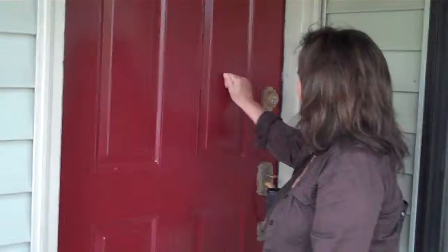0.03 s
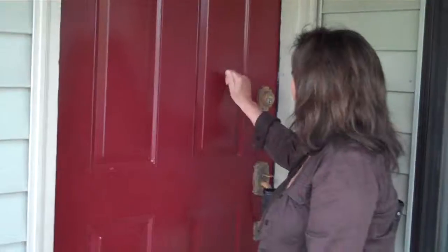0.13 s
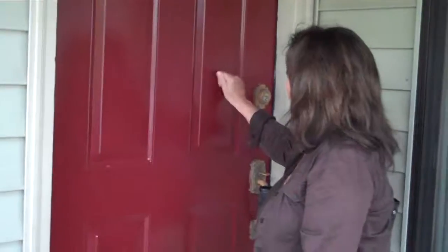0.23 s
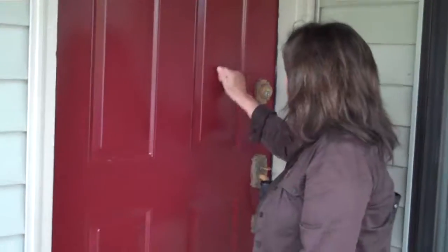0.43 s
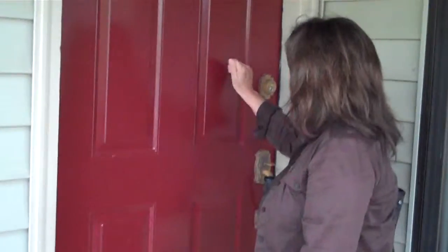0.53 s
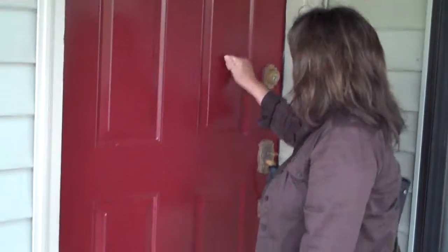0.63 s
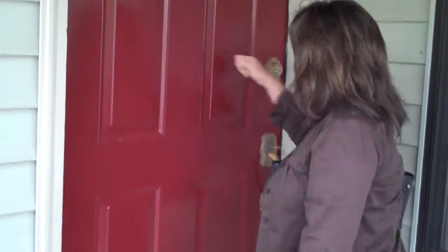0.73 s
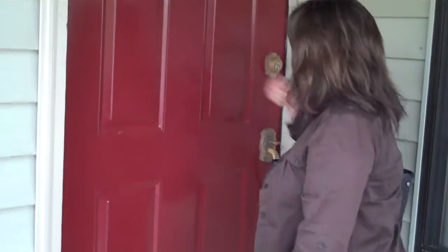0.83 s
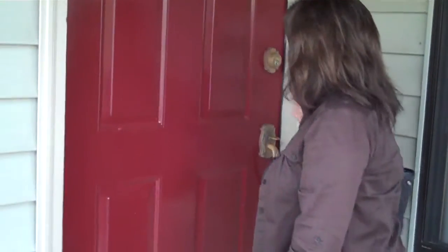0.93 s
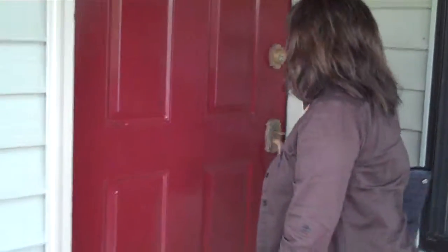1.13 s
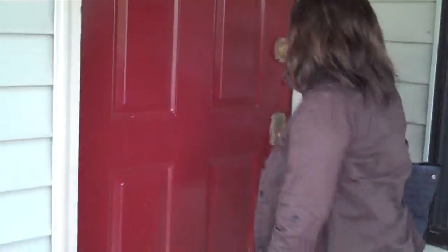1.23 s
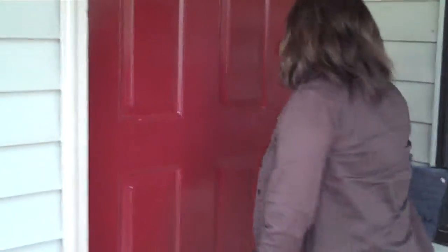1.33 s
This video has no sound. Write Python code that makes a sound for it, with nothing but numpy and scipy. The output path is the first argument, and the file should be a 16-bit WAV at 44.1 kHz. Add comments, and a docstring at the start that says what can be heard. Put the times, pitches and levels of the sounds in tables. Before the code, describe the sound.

Someone knocks four times briskly on a panelled wooden door outside, over quiet street noise

```python
"""A moment of street noise and faint low hum, then four quick knuckle raps on a panelled wooden front door.
Each rap rings the door's modes as fading sine waves, and its dense high modes are a puff of noise.
The porch returns echoes of the ring. Something small ticks: short bright cycles with hissing tails.
Brief rustles and faint tones are narrow filtered noise. At the end a scuffing noise swells, made of
dense random grains ringing a few resonances under a hiss."""
import sys
import numpy as np
from scipy import signal
from scipy.fft import rfft, irfft
from scipy.io import wavfile
from scipy.ndimage import uniform_filter1d

SR = 44100
rng = np.random.default_rng(int(sys.argv[2]) if len(sys.argv) > 2 else 0)


def store_wav(level_fs):
    """Save 16-bit WAV to argv[1]."""
    pcm = np.round(np.clip(np.atleast_2d(level_fs), -1, 1) * 32767)
    wavfile.write(sys.argv[1], SR, pcm.T.astype(np.int16))


def ratio_of_db(decibels):
    """Turn decibels (scalar or array-like) into linear amplitude factors; 0 dB maps to 1."""
    return 10 ** (np.asarray(decibels, float) / 20)


N = 61739  # length in samples, 1.4 s


def evened(x):
    """Scales a sound to an rms (average strength) of 1."""
    return x / np.sqrt(np.mean(x ** 2) + 1e-20)


def read(points, hz):
    """Reads a table between its points, along a logarithmic pitch axis."""
    f, value = np.transpose(points)
    return np.interp(np.log(hz + 1), np.log(f + 1), value)


def add(mix, s, sound):
    """Mixes a sound in at time s, in seconds."""
    part = mix[round(s * SR):][:len(sound)]
    part += sound[:len(part)]


def resonate(x, hz, width):
    """A two-pole resonance with a gain of 1 at its peak; a smaller width in Hz rings longer."""
    return signal.lfilter(*signal.iirpeak(hz, hz / width, SR), x)


def coloured(points, size):
    """Noise shaped to a given spectrum, with rms 1."""
    spectrum = rfft(rng.standard_normal(size))
    gain = ratio_of_db(read(points, np.fft.rfftfreq(size, 1 / SR)))
    return evened(irfft(spectrum * gain, size))


def street():
    """Patchy outdoor noise: random spectra whose level and treble drift from moment to moment."""
    # colour of the noise: pitch_hz, relative_level_db (per Hz)
    street_colour = [(20, -8), (40, -18), (70, -21.5), (150, -8), (204, -18), (275, -11), (415, -13),
                     (660, -7.5), (900, -7.5), (1500, -7.5), (2100, -12), (3000, -16), (5000, -20.5),
                     (9000, -24), (13700, -29.5)]
    # drift over time: time_s, level_db, treble_change_db
    street_drift = [(.04, -57, -13), (.3, -58, -8.5), (.55, -58.5, -8), (.68, -53.5, -22.5),
                    (.8, -61, -2.5), (.92, -59.5, -2.5), (0.968, -56.5, -0.5), (1.03, -57, -7.5),
                    (1.09, -58, 0), (1.15, -58.5, 1), (1.25, -58.5, 1), (1.4, -58, -11)]
    treble_hz, patchy_db = 3260, 0.8
    frames, hz = N // 256 + 5, np.fft.rfftfreq(1024, 1 / SR)
    real, imaginary, patches = rng.standard_normal((frames, 513, 3)).T
    # smooth over pitch, then over time, to make soft-edged patches
    patches = uniform_filter1d(patches, 24, 0)
    patches = evened(uniform_filter1d(patches, 8, 1))
    s, db, treble_db = np.transpose(street_drift)
    t = np.arange(frames) * 256 / SR
    noise = (real + 1j * imaginary) * ratio_of_db(read(street_colour, hz))[:, None]
    steady = signal.istft(noise, nperseg=1024, noverlap=768)[1]
    steady_rms = np.sqrt(np.mean(steady ** 2))
    # 0 in the bass, near 1 well above treble_hz
    treble_share = (hz ** 2 / (hz ** 2 + treble_hz ** 2))[:, None]
    level_db = patchy_db * patches + np.interp(t, s, db) + treble_share * np.interp(t, s, treble_db)
    drifting = signal.istft(noise * ratio_of_db(level_db), nperseg=1024, noverlap=768)[1]
    return drifting[:N] / steady_rms


def hum():
    """A low sine tone that drifts in pitch and wavers in level."""
    # path of the hum: time_s, pitch_hz, level_db (rms, before the waver)
    hum_path = [(.04, 160.6, -89), (0.298, 159.1, -70), (0.519, 160.7, -68.5), (.72, 164.7, -65.5),
                (.82, 161.3, -74), (.9, 152.8, -69.5), (1.05, 147.3, -75.5), (1.4, 153, -83)]
    waver_db = 0.5
    s, hz, db = np.transpose(hum_path)
    t = np.arange(N) / SR
    waver = uniform_filter1d(rng.standard_normal(N), 1500)
    waver = evened(uniform_filter1d(waver, 1500))
    level = np.sqrt(2) * ratio_of_db(np.interp(t, s, db) + waver_db * waver)
    phase = 2 * np.pi * np.cumsum(np.interp(t, s, hz)) / SR
    return level * np.sin(phase)


def door_ring(hardness, whole_db, panel_db):
    """A short push sets the door's modes ringing as fading sines; a harder knock favours high modes."""
    # door modes: pitch_hz, relative_level_db, t60_s (time to fade by 60 dB)
    door_modes = [(222, -5, 0.18), (249, 4.5, 0.14), (272.5, -11.5, 0.19), (326.4, -3.5, 0.12),
                  (370.5, 2.5, 0.11), (382, -24, 0.12), (426, -11.5, 0.33), (496.4, 3, 0.16),
                  (535.7, 4.5, 0.094), (611.4, 8.5, 0.039), (672, -5, 0.1), (789.6, 5, 0.076),
                  (874.6, -1.16, 0.079), (936, -9.5, 0.15), (1031, -6, 0.077), (1178, -10.5, 0.083),
                  (1364.5, 0.5, 0.033), (1387, 4.5, 0.03), (1536, -4, 0.047), (1559, -7.5, .06),
                  (1790, -11, 0.052), (2050, -21, 0.043), (2337, -21, 0.032), (2980, -51, 0.024)]
    whole_hz, panel_hz = 270, 460  # whole-door modes lie below the first, large-panel modes between
    push_s, bass_cut_hz, spot_db = 0.002, 78, 0.5
    t = np.arange(SR) / SR
    hz, db, t60 = np.transpose(door_modes)
    db = db + hardness * np.log2(hz / 700)
    db += spot_db * rng.standard_normal(len(hz))  # mode levels vary a little from rap to rap
    db += np.where(hz < whole_hz, whole_db, panel_db * (hz < panel_hz))
    hz, db, t60 = hz[:, None], db[:, None], t60[:, None]
    ring = -(ratio_of_db(db - 60 * t / t60) * np.sin(2 * np.pi * hz * t)).sum(0)
    ring *= 1 - np.exp(-t / push_s)
    bass_cut = signal.butter(2, bass_cut_hz, "high", fs=SR, output="sos")
    return signal.sosfilt(bass_cut, ring)


def door_puff(crack_db):
    """The door's high modes are too dense to hear singly: a grainy puff of noise that fades."""
    # colour of the puff: pitch_hz, relative_level_db
    puff_colour = [(30, 7), (100, 11), (300, -42), (1500, 14), (2500, 6), (3300, 3.5), (4500, -3),
                   (7000, -10), (10000, -9), (14000, -18.5)]
    puff_db, rise_s, t60_s, grain_db = -4.5, 0.0068, 0.12, 1.5
    t = np.arange(SR) / SR
    puff = coloured(puff_colour, size=SR) * (1 - np.exp(-t / rise_s))
    puff *= ratio_of_db(puff_db + crack_db - 60 * t / t60_s)
    grain = evened(uniform_filter1d(rng.standard_normal(SR), 60))
    return puff * ratio_of_db(grain_db * grain)


def raps():
    """Four knocks: each one's strength scales both its ring and its puff, returned separately."""
    # knocks: start_s, strength_db, hardness_db (per octave), whole_door_db, large_panel_db, crack_db
    knocks = [(0.0534, -37.5, 3, 3., 5.5, 7.5), (0.233, -41.5, 2.84, 4.5, -3.5, 2.1),
              (0.4179, -41, 2.7, 0.6, -2, 2), (0.6132, -40.5, 3.3, 0.8, 1.5, 0)]
    rings, puffs = np.zeros(N), np.zeros(N)
    for s, strength_db, hardness, whole_db, panel_db, crack_db in knocks:
        add(rings, s, ratio_of_db(strength_db) * door_ring(hardness, whole_db, panel_db))
        add(puffs, s, ratio_of_db(strength_db) * door_puff(crack_db))
    return rings, puffs


def porch(x):
    """Adds a few strong echoes, duller the later they come, and sparse taps dying band by band."""
    # strong echoes: delay_s, relative_level_db (before the losses below)
    early_echoes = [(.0032, 1.5), (.0047, 3), (.0066, 3.5), (.0088, -3.5), (.0105, -11.5), (0.0126, -2),
                    (.0152, -4.5), (.018, 1), (.021, -7.5), (0.024, -40), (.029, -35), (.034, -3),
                    (.041, -6)]
    # fading of the taps: pitch_hz, t60_s
    porch_fade = [(150, 0.167), (500, 0.15), (1800, .18), (5000, 0.195), (12000, 0.2)]
    tail_db, tail_start_s, tail_rise_s = -3.5, 0.01, 0.03
    dull_db_per_s_khz, bass_hz = 239, 250  # later echoes lose treble; small surfaces return little bass
    size = SR // 2
    taps = np.zeros(size)
    at = np.arange(400, size - 20, 20)
    # one tap at a random place in every 20 samples
    taps[at + rng.integers(0, 20, len(at))] = rng.choice([-1., 1.], len(at))
    hz, t, z = signal.stft(taps, SR, nperseg=256)
    fade = ratio_of_db(-60 * t / read(porch_fade, hz)[:, None])
    tail = signal.istft(z * fade, SR, nperseg=256)[1][:size]
    tail *= np.clip((np.arange(len(tail)) / SR - tail_start_s) / tail_rise_s, 0, 1)
    tail *= ratio_of_db(tail_db) / np.linalg.norm(tail)
    hz = np.fft.rfftfreq(size, 1 / SR)
    echoes = 0
    for s, db in early_echoes:
        loudness = ratio_of_db(db - dull_db_per_s_khz * s * hz / 1000)
        echoes = echoes + loudness * np.exp(-2j * np.pi * hz * s)  # the turning phase is the delay
    bass_loss = hz ** 2 / (hz ** 2 + bass_hz ** 2)
    response = tail + irfft(1 + echoes * bass_loss, size)  # the 1 is the direct sound
    return signal.fftconvolve(x, response)[:N]


def tick(db, hz, tail_db):
    """A few bright cycles, then a hissing tail that swells briefly and fades."""
    click_s, rise_s, t60_s = 0.00016, 0.0046, 0.17
    t = np.arange(SR // 8) / SR
    click = np.exp(-((t - 2 * click_s) / click_s) ** 2) * np.sin(2 * np.pi * hz * t)
    hiss = evened(resonate(rng.standard_normal(len(t)), hz, 0.52 * hz))
    tail = hiss * (1 - np.exp(-t / rise_s)) * ratio_of_db(tail_db - 60 * t / t60_s)
    return ratio_of_db(db) * (click + tail)


def ticks():
    """Places the small ticks, each with its own level and pitch."""
    # ticks: start_s, level_db, centre_hz, tail_db (relative to the click, before its rise and fade)
    tick_list = [(0.2809, -52, 7056, -16), (.3955, -67, 9600, -20), (.3995, -51.5, 10000, -18),
                 (0.4506, -42, 5556, -15), (0.4543, -36.5, 6330, -21.5), (.5932, -52, 6790, -21),
                 (.6575, -53, 7121, -14.5), (.7010, -77.5, 8500, -22), (1.089, -44, 10700, -44)]
    mix = np.zeros(N)
    for s, db, hz, tail_db in tick_list:
        add(mix, s, tick(db, hz, tail_db))
    return mix


def rustles():
    """Short swells of narrow noise: random noise through a resonance, under a bell-shaped envelope."""
    # rustles: middle_s, half_length_s (from the peak to 37 percent), pitch_hz, width_hz, peak_level_db (rms)
    rustle_list = [(0.59, 0.013, 2460, 300, -66), (0.637, 0.046, 2015, 142, -58),
                   (0.708, 0.054, 1760, 250, -63), (.70, 0.087, 2050, 151, -67.5),
                   (0.783, 0.05, 3610, 500, -69.5), (1.073, .03, 3320, 500, -68),
                   (1.306, 0.0069, 1970, 398, -57), (1.327, 0.019, 1440, 150, -54.5)]
    t = np.arange(N) / SR
    mix = np.zeros(N)
    for s, half, hz, width, db in rustle_list:
        noise = evened(resonate(rng.standard_normal(N), hz, width))
        mix += ratio_of_db(db) * np.exp(-((t - s) / half) ** 2) * noise
    return mix


def passing_tones():
    """Faint blurred tones that swell and fade together: noise through narrow resonances."""
    # tones: pitch_hz, width_hz, peak_level_db (rms)
    tone_list = [(659, 26, -65.5), (1298, 33, -70), (1800, 90, -68)]
    middle_s, span_s = 0.83, 0.13
    tones = np.zeros(N)
    for hz, width, db in tone_list:
        tones += ratio_of_db(db) * evened(resonate(rng.standard_normal(N), hz, width))
    return tones * np.exp(-((np.arange(N) / SR - middle_s) / span_s) ** 2)


def scuff():
    """Dense rubbing grains ring a few resonances; a hiss rides on top."""
    # course of the scuff: time_s, level_db, hiss_db (relative to the ringing grains)
    scuff_course = [(1.199, -75, -14), (1.271, -60, -10), (1.31, -54.5, -31), (1.34, -55.5, -5.5),
                    (1.368, -47, -16), (1.382, -54.5, -3), (1.4, -55.5, -6.5)]
    # resonances: pitch_hz, width_hz, relative_level_db
    scuff_modes = [(720, 23.3, -2), (1288, 51, 0), (1502, 180, 5.5), (1914, 31, 6), (2140, 200, 5.5),
                   (2595, 230, -3)]
    grains_per_s, spread_db, fade_in_s = 2500, 1, 0.042
    s, db, hiss_db = np.transpose(scuff_course)
    t = np.arange(N) / SR
    grains = ratio_of_db(spread_db * rng.exponential(1, N))
    grains *= rng.random(N) < grains_per_s / SR  # keep only a few samples, at random
    grains *= rng.choice([-1, 1], N)
    body = evened(sum(ratio_of_db(d) * evened(resonate(grains, f, w)) for f, w, d in scuff_modes))
    hiss = evened(resonate(rng.standard_normal(N), 3050, 3840)) * ratio_of_db(np.interp(t, s, hiss_db))
    fade_in = np.clip((t - s[0]) / fade_in_s, 0, 1)
    return (body + hiss) * ratio_of_db(np.interp(t, s, db)) * fade_in


def scene():
    """Mixes all layers into one channel; of these only the door's ring goes through the porch."""
    background = street() + hum()
    rings, puffs = raps()
    door = porch(rings) + puffs
    small_sounds = ticks() + rustles() + passing_tones()
    return (background + door + small_sounds + scuff())[None]


def low_pass(x):
    """Removes everything above the highest recorded frequency."""
    return signal.sosfilt(signal.butter(12, 13840, fs=SR, output="sos"), x)


def record(dry):
    """The sound fades in quickly after a short silence, with a slight constant offset."""
    start_s, fade_s, offset = 0.0346, 0.00083, -0.0004
    on = np.clip((np.arange(N) / SR - start_s) / fade_s, 0, 1)
    return low_pass((dry + offset) * on)


dry = scene()
out = record(dry)
store_wav(out)
```